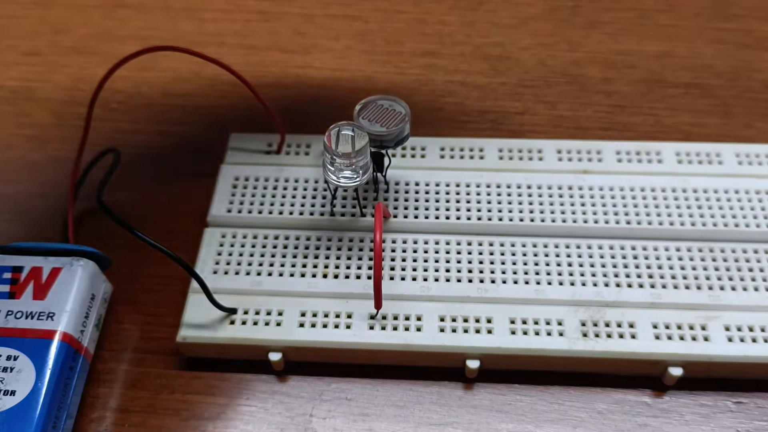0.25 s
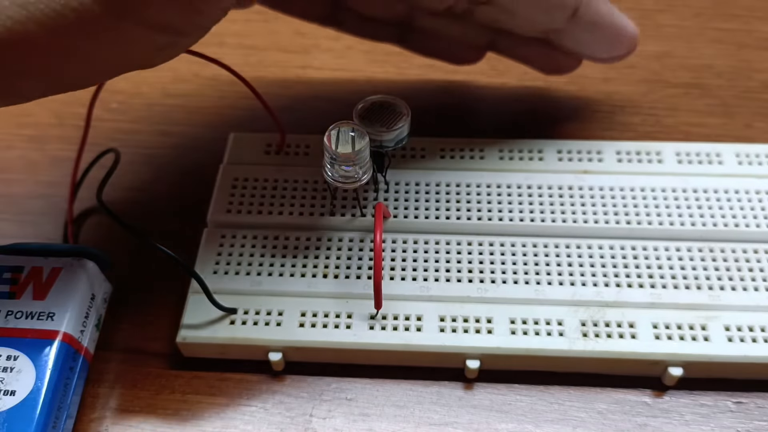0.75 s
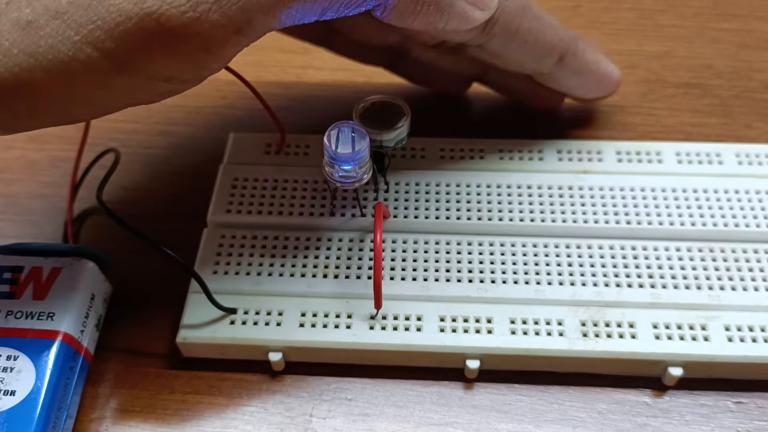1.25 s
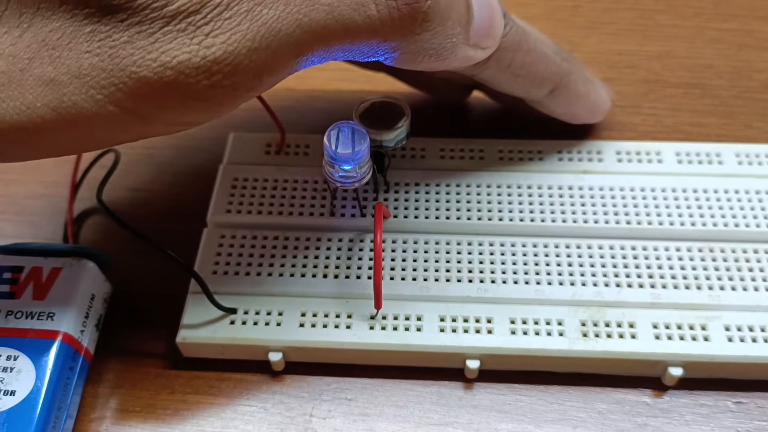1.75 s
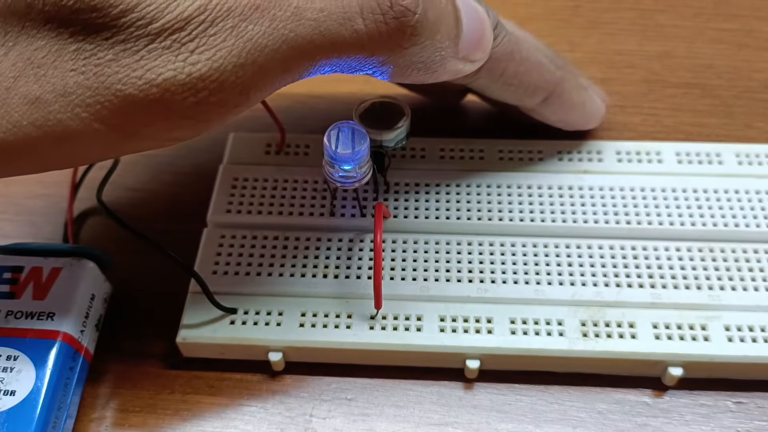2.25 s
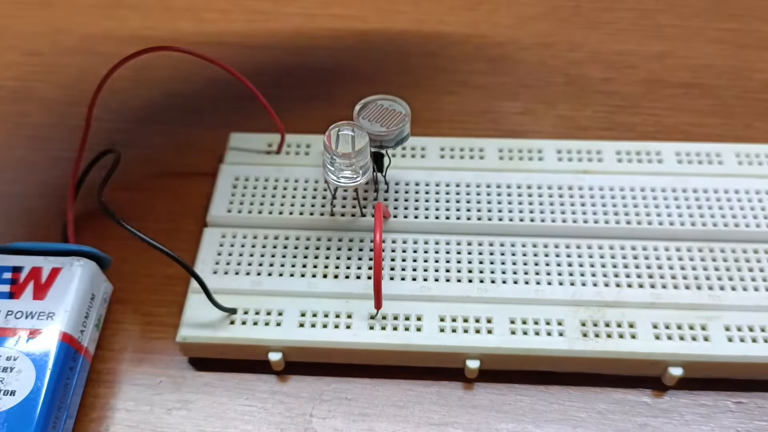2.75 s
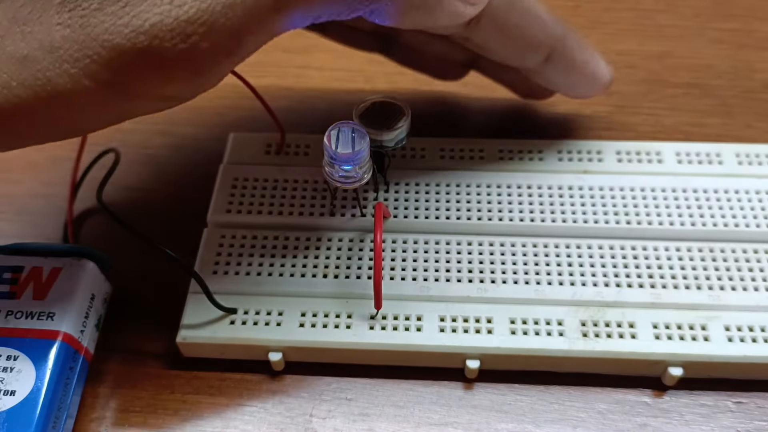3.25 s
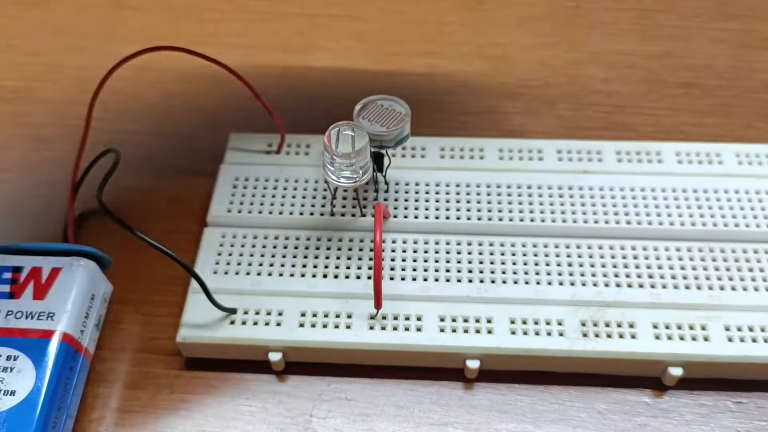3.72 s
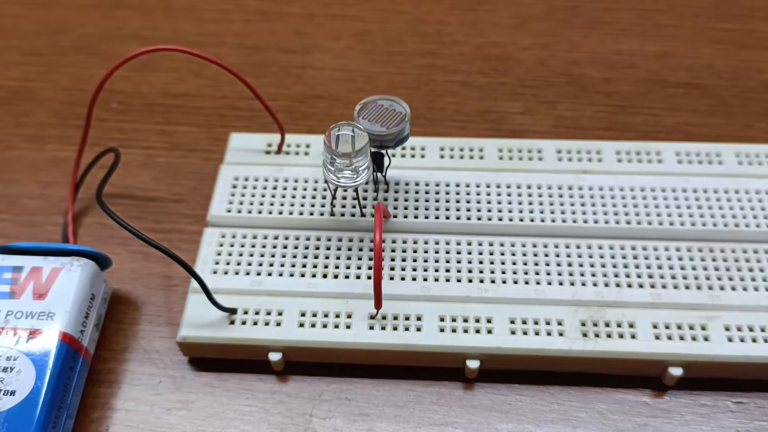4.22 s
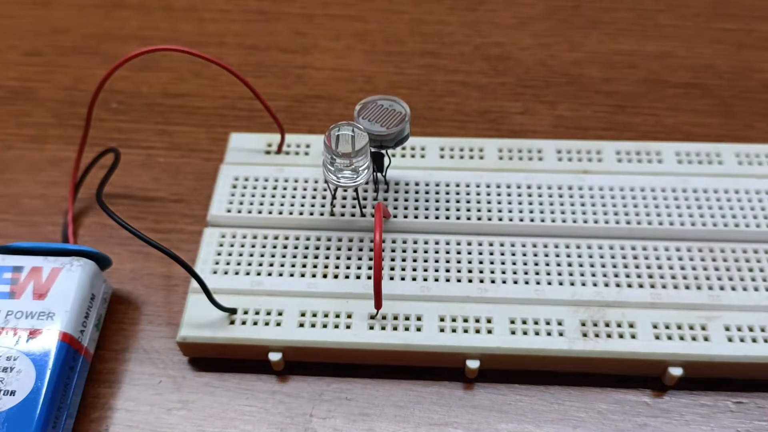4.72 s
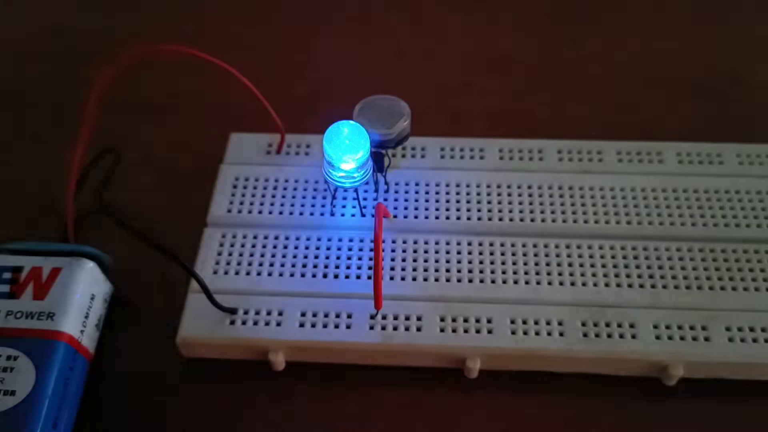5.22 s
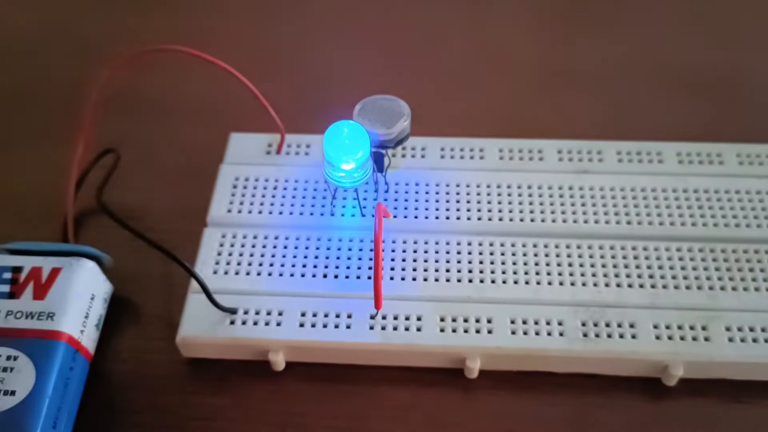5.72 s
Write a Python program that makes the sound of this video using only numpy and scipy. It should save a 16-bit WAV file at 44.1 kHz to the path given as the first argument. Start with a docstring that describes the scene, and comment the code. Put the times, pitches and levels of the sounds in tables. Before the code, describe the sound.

Faint birdsong reaches a stereo microphone in a still room: regular falling chirps, thin high calls, buzzing trills and long steady whistles. A thin high whine fades away under them, and rough crow calls join far off. Near the end comes a single sharp switch click, far louder than everything else, ringing briefly off its plate and the room, then quiet birds and rumble again.

```python
"""Birds heard from a quiet room

A small bird repeats a falling chirp, others twitter and trill, and a crow-like bird caws far off.
The birds are gliding sine tones and the crow is rough pulses through a throat; echoes blur them all.
Near the end a plastic light switch snaps once: knocks, bursts of noise and ringing sines.
Shaped noise makes a low rumble under it all, wavering sines a thin high whine."""
import sys
import numpy as np
from scipy import signal
from scipy.fft import rfft, irfft, next_fast_len
from scipy.io import wavfile
from scipy.ndimage import uniform_filter1d

SR = 44100
rng = np.random.default_rng(int(sys.argv[2]) if len(sys.argv) > 2 else 0)


def inscribe(sig):
    """Save sig as 16-bit PCM at rate SR to the path in sys.argv[1].

    A 1-D sig is mono; a 2-D sig holds one channel per row.
    Samples are clipped to [-1, 1] before scaling.
    """
    pcm = np.round(np.clip(np.atleast_2d(sig).T, -1, 1) * 32767)
    wavfile.write(sys.argv[1], SR, pcm.astype(np.int16))


N = 263268
TIME = np.arange(N) / SR


def amp(db):
    """Turns decibels into a factor."""
    return 10 ** (np.asarray(db) / 20)


def unit(x):
    """Scales x to an rms of 1."""
    return x / np.sqrt(np.mean(x ** 2) + 1e-20)


def read(points, hz):
    """Joins (Hz, value) points on a log-frequency axis."""
    f, value = np.transpose(points)
    return np.interp(np.log(hz + 1), np.log(f + 1), value)


def add(mix, s, sound):
    """Adds a sound to the mix from s seconds on, or from the very start if s is negative."""
    start = max(round(s * SR), 0)
    part = mix[..., start:][..., :sound.shape[-1]]
    part += sound[..., :part.shape[-1]]


def pan(db):
    """Gains that make the left louder than the right by db."""
    return amp(np.array([[db], [-db]]) / 2)


def colour(x, points):
    """Filters x with the gains of the (Hz, dB) points."""
    hz = np.fft.rfftfreq(x.shape[-1], 1 / SR)
    return irfft(rfft(x) * amp(read(points, hz)), x.shape[-1])


def wander(size, hz):
    """A smooth random curve of rms 1 that moves no faster than about hz."""
    span = next_fast_len(size + SR // 8)
    slow = np.exp(-(np.fft.rfftfreq(span, 1 / SR) / hz) ** 2)
    return unit(irfft(rfft(rng.standard_normal(span)) * slow, span))[:size]


def resonate(x, hz, width):
    """A resonance of gain 1 and the given width in Hz that follows the pitch hz."""
    turn = np.exp(2j * np.pi * np.cumsum(hz * np.ones(len(x))) / SR)
    r = np.exp(-np.pi * width / SR)
    # shift the resonance down to 0 Hz, smooth there, and shift back
    return 2 * (turn * signal.lfilter([1 - r], [1, -r], x / turn)).real


def echoes(x, decay, delay):
    """Dense reflections, different at each microphone, each band dying at its own speed."""
    hz, t, z = signal.stft(rng.standard_normal((2, SR)), SR, nperseg=256)
    dying = np.exp(-np.log(1000) * t / read(decay, hz)[:, None])  # down 60 dB after the decay time
    tail = signal.istft(z * dying, SR, nperseg=256)[1]
    tail *= 1 - np.exp(-(np.arange(tail.shape[1]) / SR / delay) ** 2)  # the echoes build up gradually
    tail /= np.linalg.norm(tail, axis=1, keepdims=True)
    return signal.fftconvolve(np.atleast_2d(x), tail, axes=1)[:, :N]


def syrinx(hz, db, flutter, flutter_hz, taper, waver_db, overtone=0):
    """A bird's tone on the pitch curve hz, fluttering in pitch and strength."""
    size = len(hz)
    phase = 2 * np.pi * np.cumsum(hz * (1 + flutter * wander(size, flutter_hz))) / SR
    shape = signal.windows.tukey(size, taper) * amp(waver_db * wander(size, 30))
    return amp(db) * unit(shape * (np.sin(phase) + overtone * np.sin(2 * phase)))


def whistle(length, start_hz, end_hz, db, flutter, flutter_hz, taper, bend, waver_db, overtone=0):
    """One near-sine note: it glides to its end pitch, and levels off if bend is above 1."""
    u = np.linspace(0, 1, int(length * SR))
    hz = end_hz + (start_hz - end_hz) * (1 - u) ** bend
    return syrinx(hz, db, flutter, flutter_hz, taper, waver_db, overtone)


def room_tone():
    """Low rumble from outside, lifted by two room resonances, with a faint microphone hiss on top."""
    # spectrum of the noise: f/Hz, relative level per Hz/dB
    tone_points = [(25, -14), (50, -12.5), (105, -1), (280, -4), (420, -9.5), (650, -17), (820, -15.5),
                   (1050, -20.5), (2300, -26.5), (4000, -32.5), (6000, -36), (8500, -48), (12000, -42),
                   (15300, -47.5)]
    # how alike left and right are: f/Hz, likeness (1 = the same)
    same_points = [(60, 1), (250, 0.86), (500, 0.47), (1000, 0.066), (3000, 0.086), (12000, 0.092)]
    level_db = -54
    a, b, c, d, patches = rng.standard_normal((N // 512 + 5, 1025, 5)).T
    hz = np.fft.rfftfreq(2048, 1 / SR)
    same = np.clip(read(same_points, hz), -1, 1)[:, None]
    left, other = a + 1j * b, c + 1j * d
    z = np.array([left, same * left + np.sqrt(1 - same ** 2) * other])
    resonances = [(180.7, 11.0, 7.7), (269.8, 17, 6.6)]  # f/Hz, half width/Hz, lift/dB
    lift = sum(db / (1 + ((hz - f) / width) ** 2) for f, width, db in resonances)
    # level patches, smoothed over frequency and then over time
    patches = unit(uniform_filter1d(uniform_filter1d(patches, 9, 0), 8, 1))
    z *= amp((read(tone_points, hz) + lift)[:, None] + 1.78 * patches)
    left_minus_right_db = read([(150, 2.0), (400, 0.5), (3000, 1.5), (12000, 1)], hz)
    z *= amp(np.multiply.outer([.5, -.5], left_minus_right_db))[:, :, None]
    noise = signal.istft(z, nperseg=2048, noverlap=1536)[1][:, :N]
    return amp(level_db) * unit(noise)


def whine():
    """Two thin high sines waver in pitch and strength; a shared level curve ends in a fade."""
    # shared level curve: t/s, relative level/dB
    level_points = [(0, -80.5), (.3, -84), (.55, -76.5), (.85, -85), (2.3, -83.5), (3.7, -91), (4.4, -104)]
    level = amp(np.interp(TIME, *np.transpose(level_points)))

    def tone(hz, spread_hz):
        """One sine whose pitch strays by spread_hz (rms)."""
        phase = 2 * np.pi * np.cumsum(hz + spread_hz * wander(N, 150)) / SR
        return np.sin(phase) * amp(3.0 * wander(N, 20))
    return level * np.array([amp(3.5) * tone(9200, 50) + amp(4.0) * tone(5110, 18) for microphone in range(2)])


def swells():
    """Faint distant hums and soft rustles: bands of noise that come and go."""
    # one swell a row: middle t/s, half length/s, level at its peak/dB, centre f/Hz, half width/Hz
    swell_table = [(0.183, 0.39, -65, 815, 54.6), (0.833, 0.16, -66, 1600, 820),
                   (2.95, 0.5, -63.5, 413, 25.2), (4.456, 0.02, -54, 1200, 300),
                   (4.597, 0.048, -72, 8600, 6000), (0.932, .05, -82, 9000, 6000)]
    bins = np.fft.rfftfreq(N, 1 / SR)
    noise, out = rfft(rng.standard_normal((2, N))), np.zeros((2, N))
    for s, half_length, db, hz, width in swell_table:
        band = unit(irfft(noise * np.exp(-((bins - hz) / width) ** 2), N))
        out += amp(db) * band * np.exp(-((TIME - s) / half_length) ** 2)
    return out


def small_noises():
    """Tiny high ticks are resonating puffs of noise; soft low bumps are short swells of a low sine."""
    # faint high ticks: t/s, relative level/dB, f/Hz
    tick_table = [(0.241, -66.5, 7800), (.401, -64.5, 6850), (.443, -73, 7330), (.479, -74, 7100),
                  (.558, -66.5, 7230), (4.005, -67.5, 7400)]
    # soft low bumps: middle t/s, relative level/dB
    bump_table = [(.02, -49), (1.844, -44.5), (1.96, -50), (3.082, -48.5), (3.711, -46.5), (4.051, -49.5),
                  (5.19, -46), (5.53, -47.5)]
    bump_hz = 115.6
    ticks, bumps = np.zeros(N), np.zeros(N)
    t = np.arange(SR // 8) / SR
    for s, db, hz in tick_table:
        puff = rng.standard_normal(len(t)) * np.exp(-t / .0015)
        tick = resonate(resonate(puff, hz, 1100), hz, 1100)
        add(ticks, s, amp(db + 8.0) * tick / abs(tick).max())
    middle = t - t.mean()
    for s, db in bump_table:
        bump = np.exp(-(middle / 0.019) ** 2) * np.sin(2 * np.pi * bump_hz * middle)
        add(bumps, s - t.mean(), amp(db) * bump)
    return ticks + pan(2.6) * bumps


def crow():
    """Ragged pulses on an arched pitch pass three throat resonances and echo between the houses."""
    # distant caws: t/s, length/s, relative level/dB, main throat resonance at mid-call f/Hz
    caw_table = [(2.5, .46, -57, 1640), (3.12, .42, -55.5, 1550), (3.598, 0.16, -52.5, 1570),
                 (4.0, .21, -51.5, 1263), (4.216, 0.24, -57, 1560), (4.747, 0.22, -50, 1385),
                 (5.35, .17, -54.5, 1264), (5.55, .14, -57, 1557), (5.87, .22, -55, 1340)]
    # echoes between the houses: f/Hz, time to fall by 60 dB/s
    street = [(1000, 1.3), (2000, 1.66), (4000, .8), (8000, 0.53)]
    base_hz, rough = 321.7, 4.5  # pitch before its arch and jitter; noise against pulses
    close = 0.05  # share by which the throat resonances sink as the beak closes
    # throat resonances: ratio to the main one, width/Hz, relative level/dB
    throat = [(.82, 190, 1.5), (1.0, 240, 7.5), (1.24, 371, -11)]
    calls = np.zeros(N)
    for s, length, db, open_hz in caw_table:
        u = np.linspace(0, 1, int(length * SR))
        arch = 1.02 - .22 * (u - .35) ** 2
        turns = np.cumsum(base_hz * arch * (1 + .05 * wander(len(u), 90))) / SR
        pulses = np.exp(-(turns % 1) / 0.2)
        drive = pulses * (1 + rough * rng.standard_normal(len(u))) * amp(4.0 * wander(len(u), 25))
        throat_hz = open_hz * (1 - close * (u - .5))
        voice = np.zeros(len(u))
        for ratio, width, peak_db in throat:
            hz = throat_hz * ratio
            voice += amp(peak_db) * resonate(resonate(drive, hz, width), hz, width)
        add(calls, s, amp(db) * unit(voice * signal.windows.tukey(len(u), .32)))
    calls = colour(calls, [(500, -40.5), (950, -21.5), (1200, -3.0), (2100, 3.0), (3200, -8.0)])
    return pan(2.1) * (amp(-8) * calls + amp(-2.5) * echoes(calls, street, delay=0.0033))


def twitter():
    """Gliding tones make pips, rasps and thin high calls, with a flock calling at random further off."""
    # short clean pips of other birds: t/s, relative level/dB, start f/Hz
    pip_table = [(.529, -59.5, 4530), (1.167, -60.5, 4480), (3.505, -62.5, 4400), (4.188, -63, 5150),
                 (5.579, -56.5, 6760), (5.877, -62.5, 6400)]
    pip_s, pip_fall, pip_flutter = .021, .965, .018  # length; end pitch and flutter as shares of the pitch
    # downward rasps of a twittering bird: t/s, length/s, relative level/dB
    rasp_table = [(.55, 0.056, -69), (1.39, 0.08, -71), (1.99, 0.04, -67.5), (2.293, 0.077, -70.5),
                  (2.885, 0.058, -65), (3.15, .13, -74), (3.656, .092, -70.5), (4.205, .13, -63.5),
                  (5.701, 0.049, -63.5)]
    rasp_hz, rasp_end_hz, rasp_flutter = 4870, 4150, 0.1003  # flutter as a share of the pitch
    # thin high calls, some of them together with rasps: t/s, relative level/dB, start f/Hz
    tseep_table = [(.375, -69, 6500), (.694, -71, 6500), (1.38, -70.5, 6450), (2.689, -71, 6250),
                   (2.92, -68, 6400), (3.65, -66, 6600), (4.082, -66.5, 7300), (4.41, -67.5, 6150)]
    tseep_s, tseep_fall, tseep_flutter = .075, 0.97, 0.057  # as for the pips
    flock_db, flock_spread_db = -82, 6  # faintest relative level, and how far above it calls may lie
    flock_low_hz, flock_high_hz = 4300, 6750  # range of the end pitches

    song = np.zeros(N)
    for s, db, hz in pip_table:
        add(song, s, whistle(pip_s, hz, hz * pip_fall, db, pip_flutter,
                             flutter_hz=149, taper=0.56, bend=1.9, waver_db=4.0))
    for s, length, db in rasp_table:
        add(song, s, whistle(length, rasp_hz, rasp_end_hz, db, rasp_flutter,
                             flutter_hz=203, taper=0.29, bend=1.9, waver_db=6.0))
    for s, db, hz in tseep_table:
        add(song, s, whistle(tseep_s, hz, hz * tseep_fall, db, tseep_flutter,
                             flutter_hz=150, taper=0.22, bend=1.9, waver_db=7.0))
    for when, pitch, size in rng.random((60, 3)):
        hz = flock_low_hz + (flock_high_hz - flock_low_hz) * pitch
        db = flock_db + flock_spread_db * size
        add(song, when * N / SR, whistle(0.056, hz * 1.2, hz, db, flutter=0.03,
                                         flutter_hz=120, taper=1.0, bend=0.99, waver_db=1.5))
    return song


def trill(length, db, top_hz, lower_db):
    """Two buzzing strands, one a little under the other, follow one shallow arch of pitch."""
    droop, crest = .12, .52  # depth of the arch; share of the length where the pitch is at its top
    flutter, lower_strand = .02, .905  # shares of the pitch
    u = np.linspace(0, 1, int(length * SR))
    hz = top_hz * (1 - droop * (u - crest) ** 2)
    return sum(syrinx(hz * ratio, db + strand_db, flutter, flutter_hz=227, taper=.45, waver_db=3.5)
               for ratio, strand_db in [(1, 0), (lower_strand, lower_db)])


def long_calls():
    """Arched two-strand trills and mostly long whistles of nearly steady pitch, with one short flat chirp."""
    # long buzzing trills: t/s, length/s, relative level/dB, top f/Hz, lower strand against upper/dB
    trill_table = [(.45, .6, -60.5, 3425, -5), (2.35, .76, -64.5, 3317, -8), (3.48, 1.1, -59.5, 3480, -19)]
    # plain whistles, mostly long; the last row is a short, nearly flat chirp:
    # t/s, length/s, relative level/dB, start f/Hz
    whistle_table = [(2.39, .5, -72.5, 2800), (2.88, .55, -63.5, 2795), (3.25, .18, -70.5, 3060),
                     (3.47, .8, -64.5, 2795), (4.28, .65, -65, 2775), (5.425, .08, -57.5, 2510)]
    rise, flutter = .007, .008  # shares of the pitch
    song = np.zeros(N)
    for s, *call in trill_table:
        add(song, s, trill(*call))
    for s, length, db, hz in whistle_table:
        add(song, s, whistle(length, hz, hz * (1 + rise), db, flutter,
                             flutter_hz=221, taper=.22, bend=1.0, waver_db=3.0))
    return song


def near_bird():
    """One voice with a faint overtone: falling chirps that go sharp when pushed, and a few notes that rise."""
    # falling chirps of the nearest bird: t/s, length/s, relative level/dB
    chirp_table = [(0.17, 0.071, -56.5), (0.546, 0.09, -57.5), (.941, 0.075, -59), (1.324, 0.091, -60.5),
                   (1.756, 0.069, -59), (2.139, 0.079, -57.5), (2.582, 0.065, -57), (3.038, 0.047, -64.5),
                   (3.364, .049, -51.5), (3.778, 0.062, -51.5), (4.262, 0.043, -56), (4.848, 0.041, -55.5),
                   (5.137, 0.038, -57.5), (5.787, 0.045, -55.5)]
    # rising notes slipped in mid-song: t/s, relative level/dB
    upslur_table = [(3.956, -54), (4.423, -54.5), (4.548, -56)]
    chirp_hz, chirp_end_hz = 2920, 2515  # when not pushed
    push_from_db, push_rise_per_db = -56, .009  # louder chirps go sharp, by this share of the pitch per dB
    upslur_s, upslur_hz, upslur_end_hz = .047, 2470, 2737
    voice = dict(flutter=.02, flutter_hz=149, taper=.26, bend=2.0, waver_db=3.0, overtone=amp(-17.5))
    song = np.zeros(N)
    for s, length, db in chirp_table:
        sharp = 1 + push_rise_per_db * max(db - push_from_db, 0)
        add(song, s, whistle(length, chirp_hz * sharp, chirp_end_hz * sharp, db, **voice))
    for s, db in upslur_table:
        add(song, s, whistle(upslur_s, upslur_hz, upslur_end_hz, db, **voice))
    return song


def small_birds():
    """Songs arrive mostly by reflection, with one late echo off a wall; the highest notes come from the left."""
    # reflections outside: f/Hz, time to fall by 60 dB/s
    yard = [(1000, 0.81), (2500, 0.21), (4500, 0.23), (8000, 0.26)]
    song = near_bird() + long_calls() + twitter()
    late_echo = np.interp(TIME - .105, TIME, song, left=0)
    song = song + amp(-11) * late_echo
    left, right = amp(-9.0) * song + amp(-1) * echoes(song, yard, delay=0.0028)
    left = colour(left, [(2500, 0.5), (5000, 0.5), (6500, -3.5)])
    right = colour(right, [(2500, -1), (5000, 3.0), (6500, -20.5)])
    return np.array([left, right])


def light_switch():
    """Each snap gives a short knock of the rocker and a crack of the housing; one blow sets the plate ringing."""
    # the rocker tips over, hits its stop, and the contact bounces: t/s, relative knock/dB, relative crack/dB
    snap_table = [(4.9098, -2, -4.5), (4.9119, -18.5, -5), (4.9134, 1, 4.5), (4.9167, -10, 1),
                  (4.9192, -12.5, 4)]
    # ringing of switch and wall plate: f/Hz, relative level/dB, time to fall by 60 dB/s, left minus right/dB
    plate = [(452, -5.5, 0.19, 8.5), (501, 0, 0.17, -0.5), (601, -10, 0.13, 11.5), (953, -9, 0.15, -1.5),
             (1910, -12.5, 0.15, 1.5), (2200, -3.5, 0.12, -1), (2240, -8, .14, -3), (2390, 0, .12, -1),
             (2410, -6, .12, -9), (2637, 3.5, .14, -8.5), (2790, -3, .12, -1.5), (2860, -3, .12, 1),
             (3135, 1.5, 0.13, 3), (3915, 0.5, 0.11, -14.5), (4497, -9, 0.1, -2.5), (4530, -6, 0.26, 1.5),
             (5160, -7.5, .085, 1.5), (5400, -8, 0.12, -0.5), (5780, -2.5, 0.077, 0.5),
             (6000, 1, 0.12, 5.5), (6000, -1.5, 0.1, 7), (6600, -13, 0.062, 5.5)]
    # broad resonances of the plastic housing: f/Hz, half width/Hz, relative level per Hz/dB, left minus right/dB
    housing_table = [(200, 90, -20.5, 5.5), (510, 70, -12, -4.5), (1020, 91, -17.5, -5.5),
                     (1500, 520, -19.5, 1.5), (2490, 420, -3.5, 3), (3040, 91, -3.5, 5),
                     (3930, 61, 1, -2.5), (4670, 260, -0.5, -2), (5370, 110, -4.5, 0), (6090, 280, -3, 7.5),
                     (6750, 660, -21.5, 5.5), (7560, 420, -9, 3.5), (9160, 900, -27, 3),
                     (11720, 740, -15.5, -3.5), (14000, 1400, -21.5, 1.5)]
    # echoes in the room: f/Hz, time to fall by 60 dB/s
    room = [(250, 0.16), (1000, 0.19), (2500, 0.21), (6000, 0.23), (12000, .2)]
    stop_s = 4.9136  # the blow that sets the plate ringing
    right_lag_s = 0.000492  # the waves of the ring run this much later at the right microphone
    thud_hz, thud_db, thud_t60_s = 490, -26, .07  # the box behind the plate takes the blow

    t = np.arange(SR // 3) / SR

    def fade(t60):
        """A decay that falls by 60 dB in t60 seconds."""
        return np.exp(-np.log(1000) * t / t60)
    bins = np.fft.rfftfreq(len(t), 1 / SR)
    housing = sum(pan(side_db) * amp(db) / (1 + ((bins - hz) / width) ** 4)
                  for hz, width, db, side_db in housing_table)
    knock = np.sin(2 * np.pi * 2500 * t) * fade(0.015) * (1 - np.exp(-t / 0.0012))
    click = np.zeros((2, N))
    for s, knock_db, crack_db in snap_table:
        grit = unit(irfft(rfft(rng.standard_normal((2, len(t)))) * housing, len(t)))
        add(click, s, amp(knock_db - 6.5) * knock + amp(crack_db - 21.0) * grit * fade(0.032))
    arrival = t - np.array([[0], [right_lag_s]])
    for hz, db, t60, side_db in plate:
        ring = fade(t60) * np.sin(2 * np.pi * hz * arrival)
        add(click, stop_s, pan(side_db) * amp(db - 32.5) * ring)
    thud = fade(thud_t60_s) * np.sin(2 * np.pi * thud_hz * arrival)
    add(click, stop_s, amp(thud_db) * thud)
    # so small a part radiates no bass
    click = signal.sosfilt(signal.butter(2, 260, "highpass", fs=SR, output="sos"), click)
    return click + amp(-7.5) * echoes(click, room, delay=0.0067)


def scene():
    """Adds up all the sources, left and right."""
    return room_tone() + whine() + swells() + small_noises() + crow() + small_birds() + light_switch()


def record(dry):
    """The recorder's band limit: a low-pass filter removes what lies above the edge."""
    edge_hz = 15450
    lowpass = signal.firwin(511, edge_hz, window=("kaiser", 9), fs=SR)
    return signal.oaconvolve(dry, lowpass[None], "same", axes=1)


dry = scene()
out = record(dry)
inscribe(out)
```